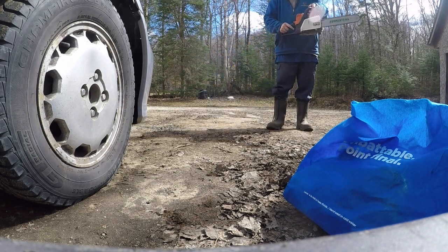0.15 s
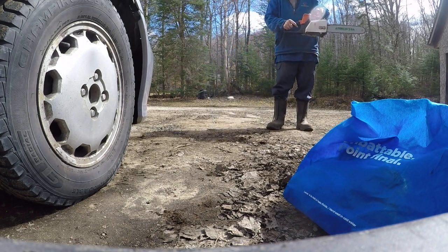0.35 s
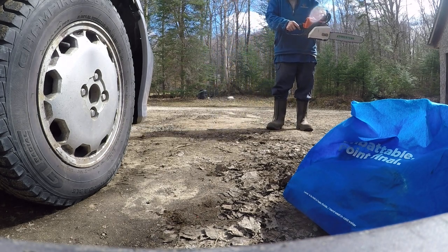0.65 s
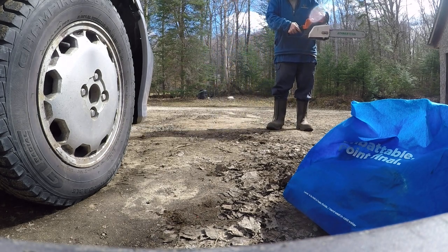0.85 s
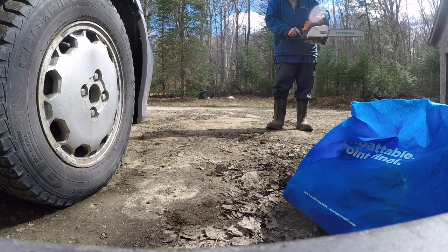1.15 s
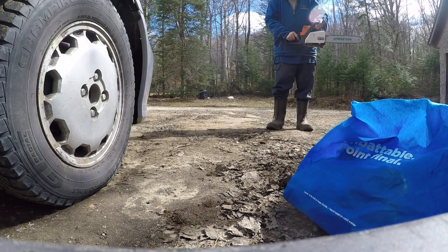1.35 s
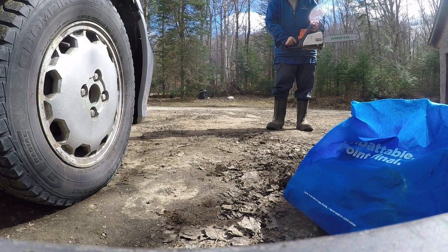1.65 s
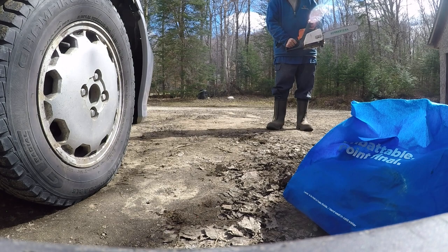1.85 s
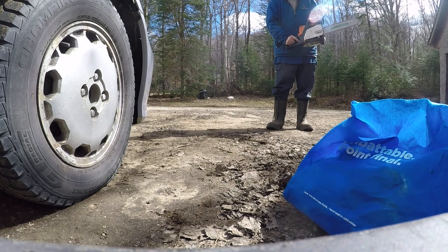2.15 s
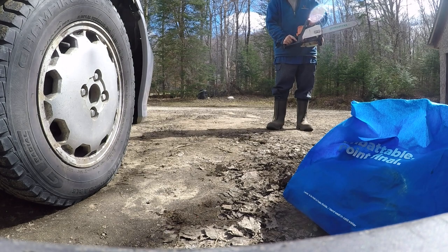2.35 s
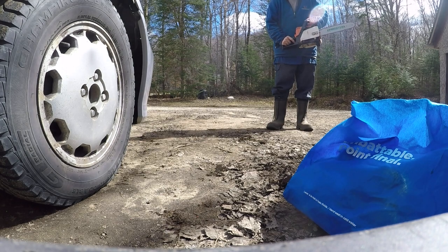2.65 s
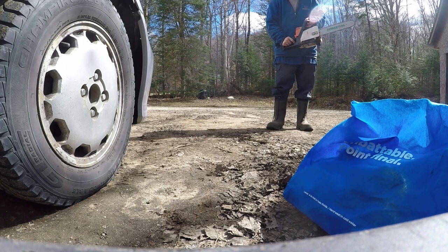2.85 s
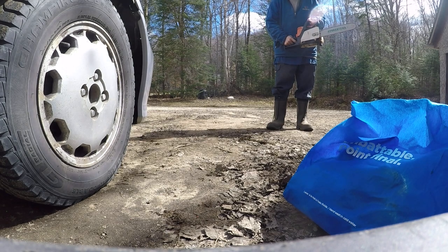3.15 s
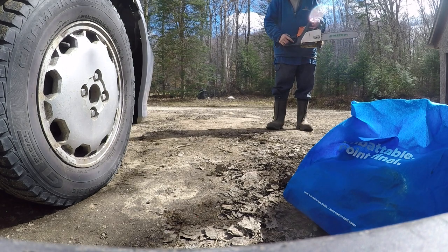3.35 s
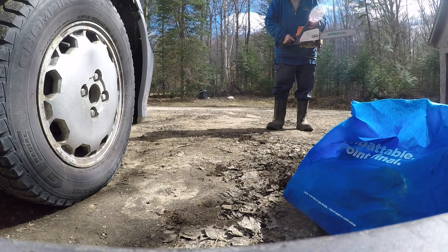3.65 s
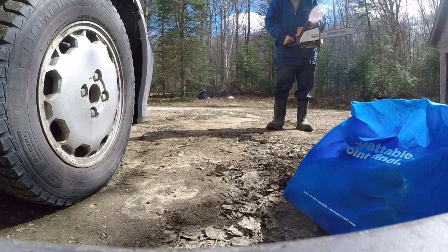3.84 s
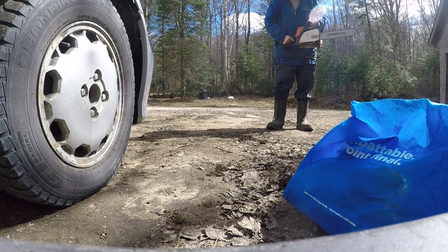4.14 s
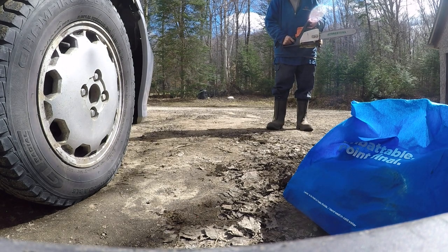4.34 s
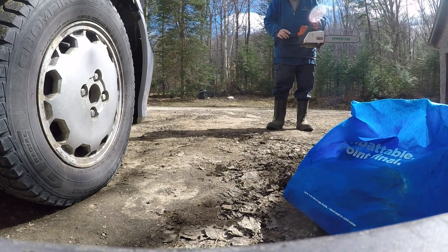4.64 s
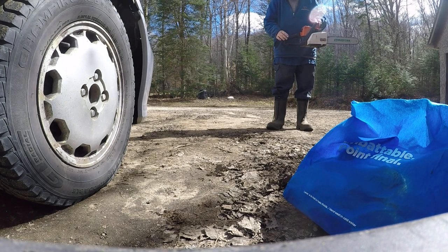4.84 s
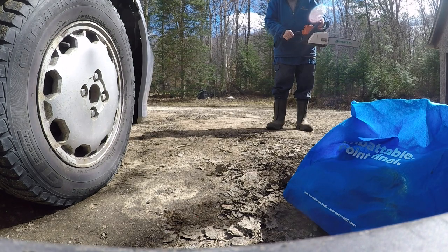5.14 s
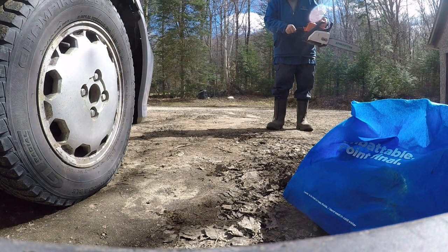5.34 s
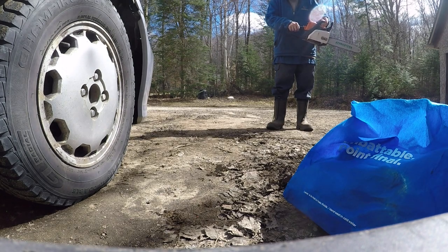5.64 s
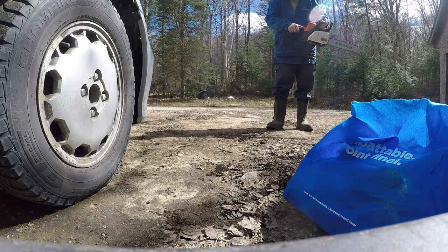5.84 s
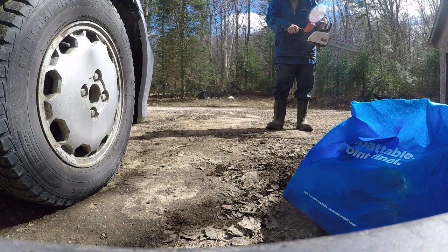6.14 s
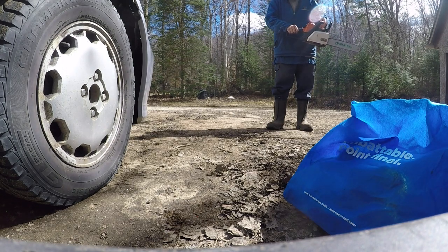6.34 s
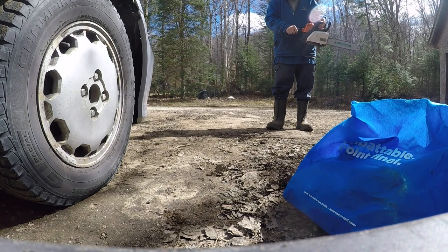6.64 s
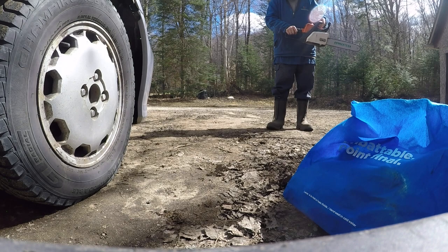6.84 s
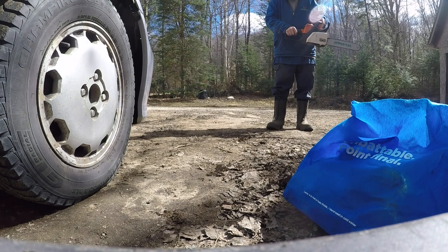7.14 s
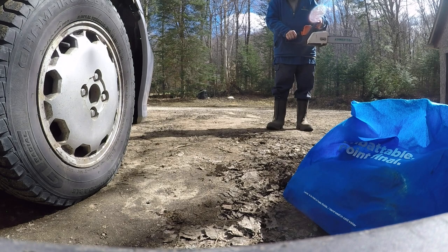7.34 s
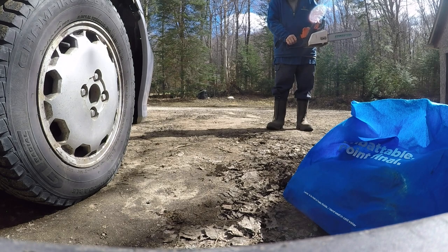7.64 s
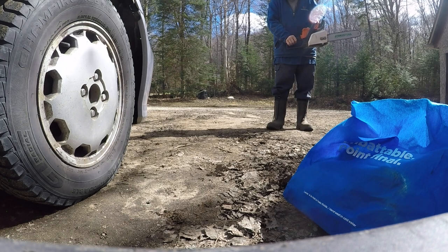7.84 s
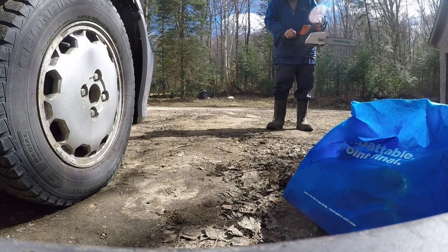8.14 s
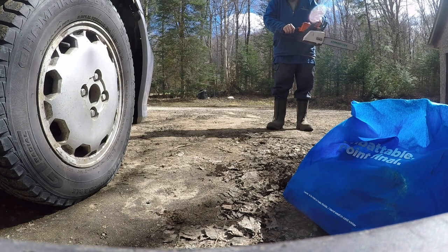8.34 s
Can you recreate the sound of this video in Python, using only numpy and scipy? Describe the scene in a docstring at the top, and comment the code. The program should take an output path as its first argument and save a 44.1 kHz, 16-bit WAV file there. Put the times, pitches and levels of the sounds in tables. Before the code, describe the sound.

A small two-stroke chainsaw runs in an open gravel yard, picked up in stereo with quiet outdoor air and a faint scattered echo. From 0 to 1.9 s it idles: a deep, muffled throb at roughly 40 to 55 puffs a second, with a sharp dry crack about every tenth of a second, hissing clutch rattle, small metallic pings and, near 1.5 to 1.8 s, brief high screeches. At 1.9 s the throttle opens with a honking gulp and bright clacks; the pitch climbs until 2.3 s into a rough buzz with chain clatter and whine, then falls, with a clang at 2.6 s. Sparse cracks and lumpy idle return around 2.9 s. Short blips swell at 3.95 and 4.4 s, followed by rattling. Uneven cracking idle continues until 7.8 s, when ignition stops; slowing puffs, dull knocks and low, sinking gasps end by about 8.4 s.

```python
"""A deep, muffled throb with sharp cracks: a small two-stroke chainsaw idles in a gravel yard.
It is revved once, blipped twice and switched off. Each crank turn puffs through resonant muffler modes.
At idle only about every sixth turn fires: it cracks and kicks the crank faster; the clutch drum rattles
in spells. At speed, filtered noise is the chain and crank overtones whine; last come knocks and gasps."""
import sys
import numpy as np
from scipy import signal
from scipy.fft import rfft, irfft, next_fast_len
from scipy.io import wavfile
from scipy.ndimage import uniform_filter1d, minimum_filter1d

SR = 44100
rng = np.random.default_rng(int(sys.argv[2]) if len(sys.argv) > 2 else 0)


def to_wav(s):
    """Save 16-bit WAV."""
    ch = np.atleast_2d(s).T  # columns
    pcm = np.round(np.clip(ch, -1, 1) * 32767)  # PCM
    wavfile.write(sys.argv[1], SR, pcm.astype(np.int16))


N = 374393
TIME = np.arange(N) / SR

# audible single firings at idle: time_s, crack_db
FIRINGS = [(0.0417, -28), (0.1619, -27), (0.2818, -31), (0.411, -29.5), (0.5792, -29.5), (0.7102, -35),
           (0.7951, -26.5), (0.9086, -29), (1.0336, -29), (1.1407, -29.5), (1.2322, -29.5), (1.3409, -28.5),
           (1.464, -28.5), (1.5786, -30), (1.6921, -26), (1.8041, -28.5), (1.916, -37), (2.8504, -41.5),
           (2.9682, -31), (3.0981, -36), (3.2128, -32.5), (3.3117, -32), (3.409, -32.5), (3.503, -30),
           (3.6135, -30), (3.771, -31), (3.8667, -28), (3.9611, -27.5), (4.6874, -32.5), (4.809, -30),
           (4.939, -30.5), (5.0775, -28), (5.203, -31), (5.4047, -28.5), (5.518, -27.5), (5.638, -25),
           (5.756, -27.5), (5.9423, -29), (6.048, -26.5), (6.1826, -30.5), (6.3054, -30.5), (6.3876, -29),
           (6.4728, -26), (6.574, -28), (6.6761, -26), (6.792, -27.5), (7.1021, -28), (7.211, -29.5),
           (7.2986, -28), (7.4064, -28.5), (7.5298, -29), (7.6364, -28)]
# bright clacks, some on firings, some as the clutch bites or lets go: time_s, clack_db
CLACKS = [(1.14, -33.5), (1.914, -28.5), (1.942, -25), (2.587, -25.5), (3.996, -33.5), (4.025, -25),
          (4.44, -26), (4.466, -30)]
# stopping piston knocks against each compression: time_s, knock_db
LAST_TURNS = [(7.953, -42), (8.004, -42.5), (8.065, -43.5), (8.134, -45.5), (8.225, -42.5), (8.36, -48.5)]
# clutch shoes chatter, after a firing or coasting: start_s, start_force_db, length_s
RATTLES = [(0.028, -35, .11), (0.161, -34.5, .115), (0.273, -36, 0.049), (0.413, -38.5, 0.067),
           (0.596, -39.5, 0.045), (0.809, -40, 0.031), (0.907, -33.5, 0.075), (1.028, -37.5, 0.06),
           (1.145, -37, 0.032), (1.232, -40, 0.056), (1.343, -37, 0.088), (1.45, -36.5, .11),
           (1.568, -36.5, 0.15), (1.698, -36.5, 0.15), (1.818, -35.5, .1), (2.684, -44.5, 0.26),
           (2.848, -42.5, 0.081), (2.966, -40, 0.14), (3.096, -38, .11), (3.19, -39.5, .095),
           (3.3, -43, 0.03), (3.404, -39.5, 0.029), (3.495, -35, 0.053), (3.611, -36, 0.12),
           (3.763, -44, 0.045), (3.864, -38, 0.039), (3.987, -38.5, .13), (4.136, -36.5, 0.28),
           (4.371, -36, .085), (4.48, -47, .09), (4.576, -37, .22), (4.796, -40, 0.14),
           (4.936, -39.5, 0.086), (5.093, -36.5, 0.058), (5.408, -40.5, 0.04), (5.636, -42, 0.03),
           (6.052, -37, 0.035), (6.795, -40, 0.041)]
# clutch shoe hits the drum squarely: start_s, level_db
PINGS = [(0.443, -29), (0.611, -26), (0.626, -38), (.808, -37), (.954, -34), (0.974, -30), (1.172, -33),
         (1.37, -37), (1.477, -28), (1.492, -25), (1.508, -37), (1.54, -26.5), (1.672, -32), (1.751, -33),
         (1.832, -38), (4.232, -33), (4.852, -29)]
# firings that set the drum screeching: time_s, level_db
SCREECHES = [(1.464, -37), (1.579, -33.5), (1.692, -34), (1.805, -35)]
# stalling piston pushes out its last air and rocks back: start_s, start_pitch_hz, swell_s, peak_db
GASPS = [(8.063, 129.5, .01, -9), (8.08, 63.4, .013, -16), (8.084, 307, 0.0091, -22.5),
         (8.137, 205.5, 0.0048, -8.5), (8.137, 85, 0.0083, -13.5), (8.171, 110, .009, -20),
         (8.227, 197, 0.0091, -14), (8.241, 40, .016, -16.5), (8.29, 212, 0.0098, -32)]

# crank speed at idle, without firing kicks: time_s, speed_hz (turns per s)
IDLE_SPEED = [(0, 53.7), (.35, 45.3), (.62, 41.2), (.77, 39.8), (.95, 43.1), (1.3, 46), (1.55, 52),
              (1.87, 51.1), (3.2, 54.1), (3.38, 40.2), (3.68, 47.2), (3.9, 39.9), (5.45, 43), (6.1, 40.2),
              (6.45, 38.3), (6.95, 41.4), (7.3, 37), (7.7, 38.8)]
# crank speed in the long rev: time_s, speed_hz (turns per s)
REV_SPEED = [(1.959, 82), (2.055, 113), (2.141, 149.8), (2.198, 164), (2.311, 182.6), (2.346, 178.1),
             (2.495, 154), (2.6, 134.5)]
# trigger presses, one rev and two blips: open_s, shut_s, open_level_db, shut_loss_db (of the puffs)
PRESSES = [(1.868, 2.31, -2.3, 15), (3.944, 4.104, 0, 7.5), (4.371, 4.535, -1, 10.5)]

# muffler, unfired turn: pitch_hz, width_hz, signed_strength
PUFF_MODES = [(43, 41, -43), (138, 194, 26.5), (253.3, 65.6, -116), (311.2, 54, 53.5), (364.6, 21, 37),
              (488, 45, 6)]
# muffler, single firing: pitch_hz, width_hz, signed_strength
BANG_MODES = [(47, 57.6, -99), (96, 195, 102.5), (227.6, 64, -83), (307, 120, -46.5)]
# muffler, under power: pitch_hz, width_hz, strength
POWER_MODES = [(60, 67, 20), (114, 102, 83), (180, 47, 5.9), (243.5, 35, 55), (359, 16, 4)]
# muffler, slow turn without ignition: pitch_hz, width_hz, signed_strength
SIGH_MODES = [(40, 15, -31), (123, 108, 96), (216, 147, -94)]
# muffler, overrun: pitch_hz, width_hz, signed_strength
HOLLOW_MODES = [(66.4, 29.5, -69.5), (133, 200, 42.5), (289.3, 44.6, -91.5)]
# air box gulping as the throttle opens: pitch_hz, width_hz, strength
GULP_MODES = [(359, 41, 130)]
# muffler humming as the fast saw coasts: pitch_hz, width_hz, strength
HUM_MODES = [(145, 26, 61)]
# steel clutch drum: pitch_hz, width_hz, relative_level_db
DRUM_MODES = [(2994, 185, 8), (3605, 83, 8.5), (4045, 130, 6), (5100, 180, 7.5), (5600, 44, 5),
              (5880, 58, 8), (7110, 340, 8), (7900, 250, 5), (8510, 180, 7.5)]
# screeching drum: pitch_hz, width_hz, relative_level_db
SCREECH_MODES = [(3510, 55, -15), (5760, 36, -5.5), (7450, 34, -7), (8180, 59, 3), (11000, 96, -9),
                 (12900, 110, -21)]
# whine, multiples of crank speed: order (turns)
WHINE_ORDERS = [5, 6, 7, 9, 10, 11, 12, 18, 19]
# whine, one row per order: pulling_db, throttle_shut_db
WHINE_LEVELS = [(-58, -51), (-51, -58), (-55, -58), (-52, -53), (-54, -55), (-48, -60), (-54, -54),
                (-58, -54), (-60, -51)]

# spectrum of the casing noise: freq_hz, relative_level_db
CASE_COLOUR = [(300, -37.5), (500, 16), (600, 3.5), (790, -2), (1020, 4.5), (1900, -4.5), (2150, -14),
               (2450, -5.5), (2950, -4.5), (4700, -13), (6000, -8), (8800, -12), (10800, -24.5),
               (15000, -49.5)]
# spectrum of the firing cracks: freq_hz, relative_level_db
CRACK_COLOUR = [(500, -31), (1300, 6), (1850, -9), (2200, -10.5), (3000, -1), (4100, -5.5), (5000, -7),
                (7500, -5.5), (9300, -0.5), (10800, -19), (15000, -33)]
# spectrum of the bright clacks: freq_hz, relative_level_db
CLACK_COLOUR = [(600, -12), (1700, 8), (2200, -25), (3050, -8.5), (4500, -7.5), (7500, 4.5), (9400, 5.5),
                (11000, -8), (15000, -19)]
# spectrum of the clutch hiss: freq_hz, relative_level_db
RATTLE_COLOUR = [(700, -6), (1700, -1), (2200, -9.5), (3400, -1.5), (4600, -6), (7500, -9), (9000, -8.5),
                 (11000, -14.5), (15000, -48.5)]
# spectrum of the chain: freq_hz, relative_level_db
CHAIN_COLOUR = [(600, -14), (1700, -5.5), (2250, -17), (3100, -6), (4600, -9), (6500, -6.5), (8400, -1.5),
                (9700, -7.5), (11200, -21), (14000, -29.5), (15500, -65)]
# spectrum of the outdoor air: freq_hz, relative_level_db
AIR_COLOUR = [(25, -8.5), (150, 2.5), (300, -19.5), (600, -31), (2000, -38.5), (4000, -48.5), (9500, -43.5),
              (14000, -73)]

# left-right correlation of the noises: freq_hz, likeness (0-1)
LIKENESS = [(60, 1), (350, 1), (500, 0.87), (1100, 0.95), (1500, 0.68), (2500, 0.41), (3200, 0.89),
            (4200, 1), (5500, 0.8), (9600, 0.46)]
# microphone level difference: freq_hz, left_minus_right_db
STEREO_LEAN = [(60, -1.1), (150, -1.8), (260, -2.9), (500, -3), (750, 3.4), (1100, 0), (1500, -5.5),
               (1900, 9), (2500, -7), (3000, -3), (3500, 0), (7000, 4.5), (8300, 0), (12000, 0)]
# microphone phase difference: freq_hz, left_lead_rad
STEREO_LEAD = [(20, 0), (70, -.1), (160, -.26), (280, -.45), (500, -1.17), (750, -2), (1100, -1.5),
               (1500, -2.15), (1900, -0.4), (2500, -1.8), (3000, 0.46), (4200, -1.5), (7000, -1),
               (8300, -1.03), (12000, -2)]

OPEN_S, SHUT_S = 0.05, 0.034  # throttle travel
PICKUP_HZ, BLIP_HZ, BLIP_RISE_S = 49.74, 90.4, 0.147  # a blip climbs from first to second speed
DROP_S, COAST_HZ, COAST_SAG_HZ_PER_S = 0.04, 70.15, 52  # quick drop, then sinks to idle
KICK_HZ, KICK_S = 10, 0.12  # speed step per firing and its decay
SWITCH_OFF_S, SPIN_DOWN_S = 7.775, 0.284  # ignition off; decay time constant of the speed
TOP_HZ = 15300
# crank speed ranges, turns per s (from, to)
STALL_HZ = (13.6, 19)  # puffs grow from none to full
RUSTLE_HZ = (2.5, 27.7)  # bearing noise grows to full
LAG_HZ = (12, 30.3)  # puffs come late below the top
DROOP_HZ, DROOP = (33.3, 55.5), 0.8624  # below: deepest muffler mode lost, others lowered by the factor
STARVE_HZ = (48.8, 68.3)  # a shut throttle starves the puffs
CHAIN_HZ = (76.6, 119)  # the chain sets in
WHINE_HZ = (92, 118)  # the whine sets in
RICH_HZ = (165, 170)  # rich mixture: every third puff weakens


def amp(db):
    """Decibels to gain."""
    return 10 ** (np.asarray(db) / 20)


def unit(x):
    """Scale to rms 1."""
    return x / np.sqrt(np.mean(x ** 2) + 1e-20)


def ramp(x, start, end):
    """0 below start, 1 above end, straight between."""
    return np.clip((x - start) / max(end - start, 1e-6), 0, 1)


def along(points, hz):
    """(Hz, value) points read on a log axis."""
    f, v = np.transpose(points)
    return np.interp(np.log(hz + 1), np.log(f + 1), v)


def curve(rows):
    """A (s, value) table, per sample."""
    return np.interp(TIME, *np.transpose(rows))


def filtered(x, response):
    """x times a complex response of frequency."""
    m = next_fast_len(N + SR // 2)
    return irfft(rfft(x, m) * response(np.fft.rfftfreq(m, 1 / SR)), m)[..., :N]


def resonances(modes, f):
    """Causal response of (Hz, width Hz, strength) modes."""
    return sum(g * 1j * f * w / (c * c - f * f + 1j * f * w) for c, w, g in modes)


def noise(colour):
    """Coloured stereo noise of rms 1, partly alike in both channels."""
    def shape(hz):
        turn = np.arccos(np.clip(along(LIKENESS, hz), 0, 1)) / 2
        return amp(along(colour, hz)) * [np.cos(turn), np.sin(turn)]
    mid, side = filtered(rng.standard_normal((2, N)), shape)
    return unit(np.array([mid + side, mid - side]))


def sample_at(index):
    """Indices held inside the scene."""
    return np.clip(index, 0, N - 1)


def decays(times_s, sizes, life_s):
    """Envelope that jumps at each time and decays with time constant life_s."""
    jumps = np.bincount(sample_at(np.round(times_s * SR).astype(int)), sizes, N)
    return signal.lfilter([1], [1, -np.exp(-1 / (life_s * SR))], jumps)


def slaps(strokes, delay_s, life_s, scatter_db):
    """Envelope of rms 1: loose parts knock once a turn, each time with new force."""
    chance = rng.standard_normal((len(strokes), 2))
    times_s = strokes / SR + delay_s + 0.00053 * chance[:, 0]
    return unit(decays(times_s, amp(scatter_db * chance[:, 1]), life_s))


def throttle():
    """Throttle opening, 0-1."""
    return sum(ramp(TIME, on, on + OPEN_S) - ramp(TIME, off, off + SHUT_S) for on, off, _, _ in PRESSES)


def pace():
    """Crank speed without kicks: idle, a surge and coast per press, then exponential spin-down."""
    surges = [[(PRESSES[0][0], PICKUP_HZ), *REV_SPEED]]
    for on, off, _, _ in PRESSES[1:]:
        surges.append([(on, PICKUP_HZ), (min(on + BLIP_RISE_S, off), BLIP_HZ), (off, BLIP_HZ)])
    speed = curve(IDLE_SPEED)
    for surge in surges:
        free_s = surge[-1][0] + DROP_S
        coast = [(free_s, COAST_HZ), (free_s + 2, COAST_HZ - 2 * COAST_SAG_HZ_PER_S)]
        speed = np.maximum(speed, curve(surge + coast) * (TIME > surge[0][0]))
    return speed * np.exp(-np.maximum(TIME - SWITCH_OFF_S, 0) / SPIN_DOWN_S)


def crank(speed):
    """Crank angle in turns: firings kick the speed up; firings and last knocks fall on whole turns."""
    fired_s = np.array(FIRINGS)[:, 0]
    kicks = decays(fired_s, np.full(len(fired_s), KICK_HZ), KICK_S) * (1 - throttle())
    turns = np.cumsum(speed + kicks) / SR
    tops_s = np.concatenate([fired_s, np.array(LAST_TURNS)[:, 0]])
    slip = np.unwrap(-np.interp(tops_s, TIME, turns) % 1, period=1)
    return turns + np.interp(TIME, tops_s, slip)


def charge_db(speed, fast_loss_db=2):
    """Puff size: each press sets its open-throttle level; a shut throttle starves a fast crank."""
    on, _, open_level_db, loss_db = np.transpose(PRESSES)
    latest = np.maximum(np.searchsorted(on, TIME) - 1, 0)
    fed_db = open_level_db[latest] - fast_loss_db * ramp(speed, *CHAIN_HZ)
    starved_db = loss_db[latest] * ramp(speed, *STARVE_HZ)
    return throttle() * fed_db - (1 - throttle()) * starved_db


def gulp(speed):
    """How hard the engine sucks air, 0-1: open throttle at low speed."""
    return throttle() * np.clip((112 - speed) / 35, 0, 1)


def exhaust(strokes, crank_hz, scatter_db=0.97, muffle_hz=352, jitter_s=0.00042,
            overrun_jitter_s=0.00024, honk_cut=0.36, misfire=0.38, stall_lag_s=0.006):
    """One puff a turn rings the muffler; firing, power and slowness each change its ring."""
    speed, size_db, opening = crank_hz[strokes], charge_db(crank_hz)[strokes], throttle()[strokes]
    sucking = gulp(crank_hz)[strokes]
    chance = rng.standard_normal((len(strokes), 4))
    power = np.clip(np.maximum(opening * ramp(speed, 48, 63), (speed - 85) / 40), 0, 1)
    slow = np.clip((33 - speed) / 16, 0, 1)
    # throttle snapped shut: weak, hollow, ragged puffs
    overrun = np.clip(-(size_db + 3.0) / 5, 0, 1) * (1 - power) * (1 - slow)
    fired = np.abs(strokes[:, None] / SR - np.array(FIRINGS)[:, 0]).min(axis=1) < 0.004
    burnt = np.clip(fired + 0.12 * chance[:, 2] * (strokes / SR < SWITCH_OFF_S), 0, 1)

    size = amp(size_db + 2.5 + scatter_db * (1 - power + overrun) * chance[:, 0])
    size = size * ramp(speed, *STALL_HZ)
    third = np.arange(len(strokes)) % 3 == 0
    size = size * (1 - misfire * opening * ramp(speed, *RICH_HZ) * third)
    size = size * (1 - honk_cut * sucking)

    spread_s = jitter_s * (1 - power + 0.7 * sucking) + overrun_jitter_s * overrun
    late_s = spread_s * chance[:, 1] + stall_lag_s * (1 - ramp(speed, *LAG_HZ)) ** 2
    at = sample_at(strokes + np.round(late_s * SR).astype(int))

    idle = (1 - power) * (1 - slow) * (1 - 0.47 * overrun)
    taut = np.clip(ramp(speed, *DROOP_HZ) + 0.2 * chance[:, 3], 0, 1)
    hum = ramp(speed, *CHAIN_HZ) * (1 - opening)
    gulping = opening * (1 - ramp(speed, 58, 73))
    drooped = [(hz * DROOP, width, strength) for hz, width, strength in PUFF_MODES[1:]]
    kinds = [(PUFF_MODES, idle * (1 - burnt) * taut), (drooped, idle * (1 - burnt) * (1 - taut)),
             (BANG_MODES, idle * burnt), (POWER_MODES, power), (HOLLOW_MODES, 1.36 * overrun),
             (SIGH_MODES, slow), (HUM_MODES, hum), (GULP_MODES, gulping)]
    throb = np.zeros(N)
    for modes, share in kinds:
        throb += filtered(np.bincount(at, size * share, N), lambda f: resonances(modes, f))
    # a slow piston springs back off the compression: second, weaker puff
    rebound_s = 0.019 + 0.0061 * chance[:, 1]
    again = sample_at(at + np.round(rebound_s * SR).astype(int))
    throb += filtered(np.bincount(again, 0.22 * size * slow, N), lambda f: resonances(SIGH_MODES, f))
    wall = signal.butter(6, muffle_hz, analog=True)
    return filtered(throb, lambda f: signal.freqs(*wall, f)[1])


def casing(strokes, speed, level_db=-42.0, follows=0.56, smooth_db=5, steady=0.58):
    """Piston and bearings rustle once a turn, louder with larger puffs, softer at full speed."""
    beat = unit(steady + slaps(strokes, delay_s=0.0017, life_s=0.018, scatter_db=4.0))
    loudness_db = level_db + follows * charge_db(speed) - smooth_db * ramp(speed, *CHAIN_HZ)
    return amp(loudness_db) * ramp(speed, *RUSTLE_HZ) * beat * noise(CASE_COLOUR)


def shoes(speed, graze_db=-55, fade_db=3.5, release_s=0.006):
    """Clutch shoe force on the drum: each spell eases, then stops short; a light graze underlies all."""
    force = np.zeros(N)
    for start_s, db, length_s in RATTLES:
        first = np.searchsorted(TIME, start_s)
        t = TIME[first:][:SR // 2] - start_s
        spell = amp(db - fade_db * t / length_s) * np.exp(-np.maximum(t - length_s, 0) / release_s)
        span = slice(first, first + len(t))
        force[span] = np.maximum(force[span], spell)
    return force + amp(graze_db) * ramp(speed, *RUSTLE_HZ)


def clutch(strokes, speed, hiss_db=-6, ring_db=-2, dull_hz=9800, shift_db=3.0, steady=0.24):
    """The shoes strike the drum once a turn; each time they land elsewhere and favour other modes."""
    beat = uniform_filter1d(slaps(strokes, delay_s=0.0002, life_s=0.008, scatter_db=1.5), size=70)
    force = shoes(speed) * unit(steady + beat)
    scrape = force * unit(rng.standard_normal(N) + 0.41 * rng.standard_normal((2, N)))
    turn = np.searchsorted(strokes, np.arange(N))
    favour = amp(shift_db * rng.standard_normal((len(strokes) + 1, len(DRUM_MODES))))
    ring = np.zeros((2, N))
    for k, (hz, width, level_db) in enumerate(DRUM_MODES):
        mode = (hz, width, (-1) ** k * amp(level_db))
        ring += filtered(favour[turn, k] * scrape, lambda f: resonances([mode], f))
    ring = filtered(ring, lambda f: 1 / (1 + (f / dull_hz) ** 12))
    hiss = force * noise(RATTLE_COLOUR)
    return amp(hiss_db) * hiss + amp(ring_db) * scrape.std() * unit(ring)


def cracks(life_s=0.0077, clack_life_s=0.0075, ring_db=-11, ring_life_s=0.012):
    """Firings and last knocks snap, clacks snap brighter; the drum rings briefly after each."""
    snap_s, snap_db = np.vstack([FIRINGS, LAST_TURNS]).T
    clack_s, clack_db = np.transpose(CLACKS)
    snaps = uniform_filter1d(decays(snap_s, amp(snap_db), life_s), size=150) * noise(CRACK_COLOUR)
    clacks = uniform_filter1d(decays(clack_s, amp(clack_db), clack_life_s), size=120)
    clacks = clacks * noise(CLACK_COLOUR)
    tail_gain = amp(np.r_[snap_db, clack_db] + ring_db)
    tails = uniform_filter1d(decays(np.r_[snap_s, clack_s], tail_gain, ring_life_s), size=150)
    modes = [(hz, width, amp(level_db)) for hz, width, level_db in DRUM_MODES[:3]]
    drum = filtered(rng.standard_normal(N), lambda f: resonances(modes, f) * (f > 2400) * (f < 4500))
    return snaps + clacks + tails * unit(drum)


def knocks(knock_db=28, low_hz=1050, high_hz=1900, delay_s=0.000994):
    """The pressure jump of each firing knocks once on the cylinder: a band-passed impulse."""
    times_s, db = np.transpose(FIRINGS)
    blows = np.bincount(np.round((times_s + delay_s) * SR).astype(int), amp(db + knock_db), N)
    band = signal.butter(3, [low_hz, high_hz], "band", analog=True)
    return filtered(blows, lambda f: signal.freqs(*band, f)[1])


def pings(life_s=0.0045, attack_s=0.0005, upper_db=-9, detune=0.025):
    """A square hit briefly rings the drum's two lowest modes, never quite at the same pitch."""
    out, t = np.zeros(N), TIME[:SR // 20]
    for (start_s, db), chance in zip(PINGS, rng.standard_normal((len(PINGS), 2))):
        low, upper = (np.sin(2 * np.pi * DRUM_MODES[k][0] * (1 + detune * chance[k]) * t) for k in range(2))
        ring = (low + amp(upper_db) * upper) * np.exp(-t / life_s) * (1 - np.exp(-t / attack_s))
        out[round(start_s * SR):][:len(t)] += amp(db) * ring
    return out


def screech(strokes, life_s=0.034, hit_life_s=0.005, steady=0.15):
    """Some firings strike the drum, and its high, narrow modes chirp again on the next turns."""
    times_s, db = np.transpose(SCREECHES)
    beat = slaps(strokes, delay_s=0.001, life_s=0.018, scatter_db=3.0)
    chirps = unit(steady + uniform_filter1d(beat, size=110))

    def modes(f):
        return sum(np.abs(resonances([(hz, width, 1)], f)) ** 2 * amp(level_db)
                   for hz, width, level_db in SCREECH_MODES)
    ring = filtered(rng.standard_normal(N) + 0.5 * rng.standard_normal((2, N)), modes)
    force = decays(times_s, amp(db), life_s) * chirps + decays(times_s, amp(db), hit_life_s)
    return uniform_filter1d(force, size=80) * unit(ring)


def intake(turns, speed, honk_db=-7.5, delay_s=0.0035):
    """The air box honks on three times the crank speed as the engine picks up."""
    angle = np.interp(TIME - delay_s, TIME, turns)
    return amp(honk_db) * uniform_filter1d(gulp(speed), size=600) * np.cos(2 * np.pi * 3 * angle)


def rasp(strokes, speed, rasp_db=-48, pull_db=-44, life_s=0.0012, dull_hz=2800):
    """At speed or under throttle every turn raps the casing, unevenly in force and time: a rough buzz."""
    t = TIME[:SR // 100]
    rap = rng.standard_normal(len(t)) * np.exp(-t / life_s)
    fast = amp(rasp_db) * ramp(speed, *CHAIN_HZ)
    pulling = amp(pull_db) * throttle() * ramp(speed, *STARVE_HZ)
    force = np.maximum(fast, pulling)
    chance = rng.standard_normal((len(strokes), 2))
    stray_s = 0.00001 + 0.00015 * ramp(speed, *RICH_HZ)[strokes]
    at = sample_at(strokes + np.round(stray_s * chance[:, 0] * SR).astype(int))
    raps = np.bincount(at, force[strokes] * amp(1.3 * chance[:, 1]), N) * np.sqrt(SR / 160)

    def colour(f):
        low_cut = f ** 4 / (f ** 4 + 1250 ** 4)
        return unit(amp(along(CASE_COLOUR, f)) / (1 + (f / dull_hz) ** 2) * low_cut)
    return filtered(signal.fftconvolve(raps, rap / np.linalg.norm(rap))[:N], colour)


def chain(turns, speed, level_db=-33.0, slack_db=2, swing=0.1, grain_db=1.0):
    """Links clatter round the bar, surging every crank turn, louder once the chain runs slack."""
    grain = amp(grain_db * unit(uniform_filter1d(rng.standard_normal(N), size=60)))
    level = amp(level_db + slack_db * (1 - throttle())) * ramp(speed, *CHAIN_HZ)
    surge = 1 + swing * np.cos(2 * np.pi * turns)
    return level * unit(grain * surge) * noise(CHAIN_COLOUR)


def whine(turns, speed, waver_db=3, misfire_db=-7):
    """Crank and sprocket sing on overtones that glide with the rev; the higher, the rougher."""
    opening, tone = throttle(), np.zeros(N)
    for order, (pull_db, shut_db) in zip(WHINE_ORDERS, WHINE_LEVELS):
        waver = np.interp(TIME, np.linspace(0, TIME[-1], num=340), rng.standard_normal(size=340))
        shake_rad = 0.028 * order * unit(uniform_filter1d(rng.standard_normal(N), size=300))
        level_db = shut_db + (pull_db - shut_db) * opening + waver_db * waver
        tone += amp(level_db) * np.sin(2 * np.pi * (order * turns + rng.random()) + shake_rad)
    misfiring = amp(misfire_db * opening * ramp(speed, *RICH_HZ))
    return np.sqrt(2) * ramp(speed, *WHINE_HZ) * misfiring * tone


def release(time_s=2.589, level_db=-25, ring_s=0.009):
    """As the long rev ends, the shoes snap back and clang on the drum's lowest mode, here broadened."""
    hz, width, _ = DRUM_MODES[0]
    ring = filtered(rng.standard_normal(N), lambda f: resonances([(hz, 5 * width, 1)], f) ** 2)
    return uniform_filter1d(decays(np.array([time_s]), [amp(level_db)], ring_s), size=100) * unit(ring)


def gasps(sink_per_s=3.3):
    """Each last push of air swells, sinks in pitch and dies."""
    out, t = np.zeros(N), TIME[:SR // 8]
    for start_s, hz, swell_s, db in GASPS:
        swell = (t / swell_s * np.exp(1 - t / swell_s)) ** 2
        push = swell * np.sin(2 * np.pi * hz * t * (1 - sink_per_s * t / 2))
        out += np.bincount(sample_at(round(start_s * SR) + np.arange(len(t))), amp(db) * push, N)
    return out


def yard(x, t60_s=1.09, wet_db=-13.5):
    """Ground, wall and trees send back a faint scattered tail: decaying noise, convolved."""
    t = TIME[:SR]
    tail = rng.standard_normal(len(t)) * amp(-60 * t / t60_s) * (t > 0.008)
    return x + amp(wet_db) * signal.fftconvolve(x, tail[None] / np.linalg.norm(tail), axes=1)[:, :N]


def scene():
    """The saw in the yard, over quiet outdoor air."""
    speed = pace()
    turns = crank(speed)
    strokes = np.flatnonzero(np.diff(np.floor(turns)) > 0)  # sample of each whole turn
    engine = exhaust(strokes, speed) + casing(strokes, speed) + cracks() + knocks()
    engine = engine + intake(turns, speed) + rasp(strokes, speed) + gasps()
    drive = clutch(strokes, speed) + pings() + screech(strokes)
    drive = drive + chain(turns, speed) + whine(turns, speed) + release()
    return yard(engine + drive) + amp(-38.5) * noise(AIR_COLOUR)


def record(dry):
    """Two microphone ports differ in level and phase; a limiter holds the peaks; the band ends steeply."""
    def ports(hz):
        half = amp(along(STEREO_LEAN, hz) / 2) * np.exp(0.5j * along(STEREO_LEAD, hz))
        return np.array([half, 1 / half])
    pair = filtered(dry, ports)
    needed = np.minimum(1, 0.93 / (np.abs(pair).max(axis=0) + 1e-9))
    gain = uniform_filter1d(minimum_filter1d(needed, size=500), size=500)
    return filtered(pair * gain, lambda hz: hz < TOP_HZ)


dry = scene()
out = record(dry)
to_wav(out)
```